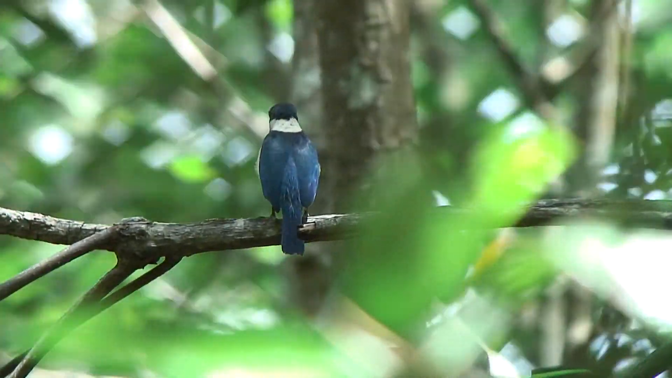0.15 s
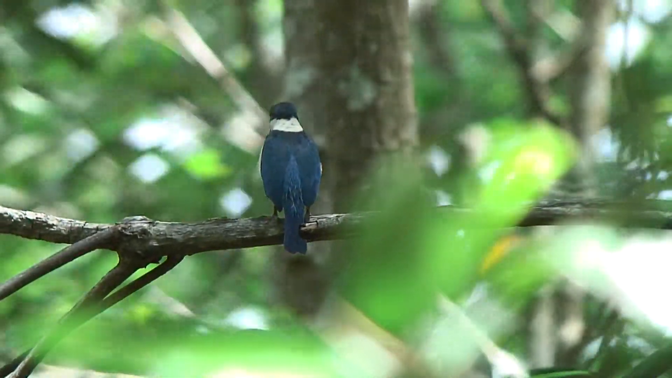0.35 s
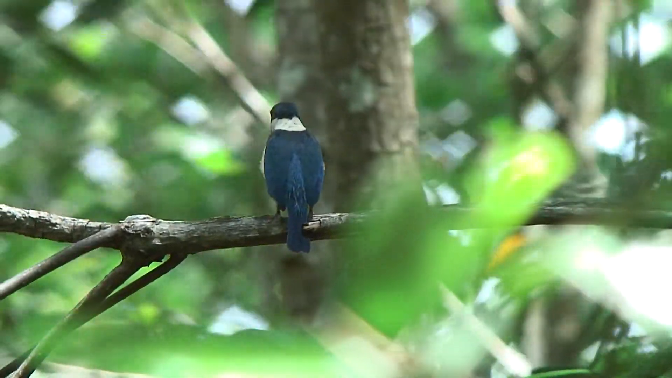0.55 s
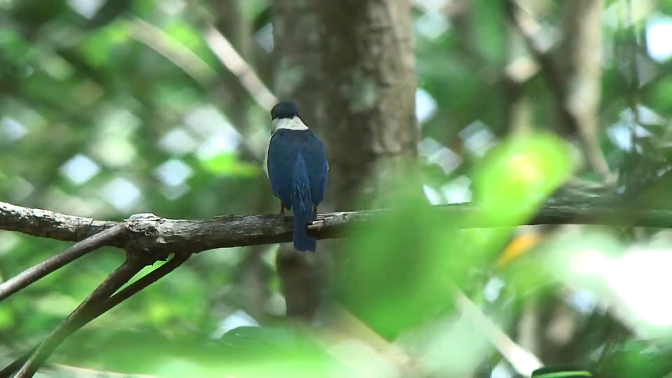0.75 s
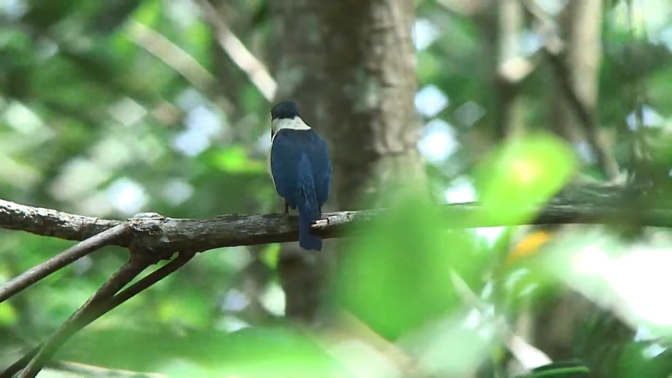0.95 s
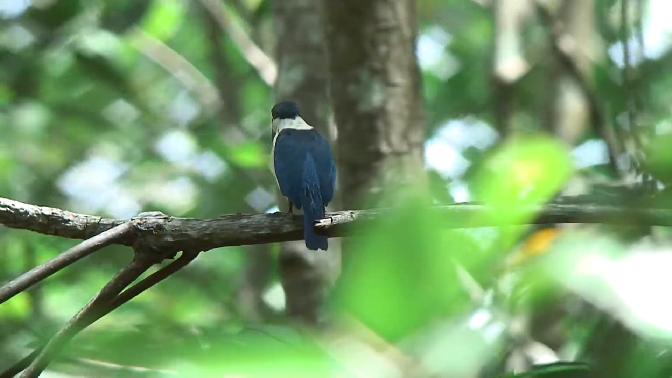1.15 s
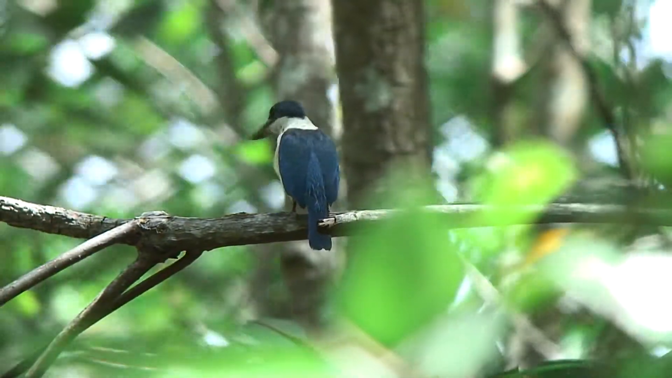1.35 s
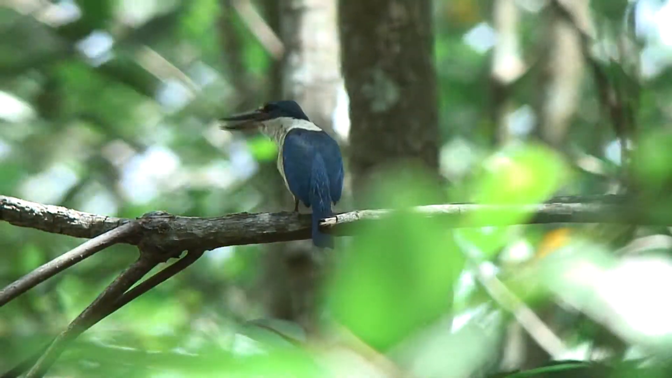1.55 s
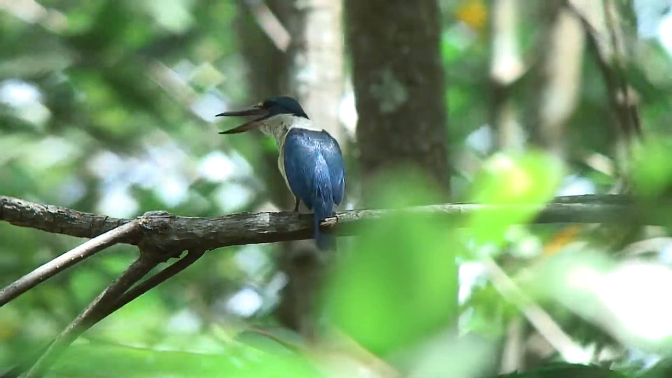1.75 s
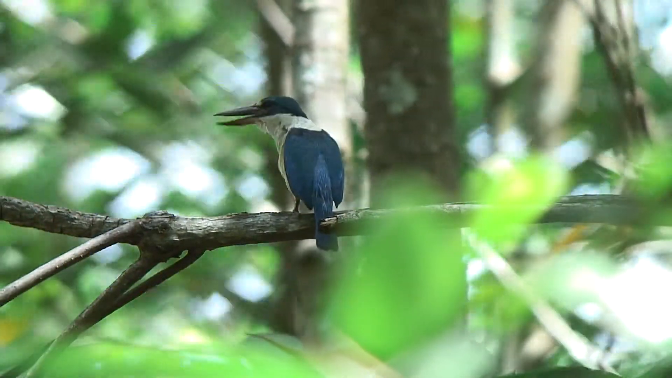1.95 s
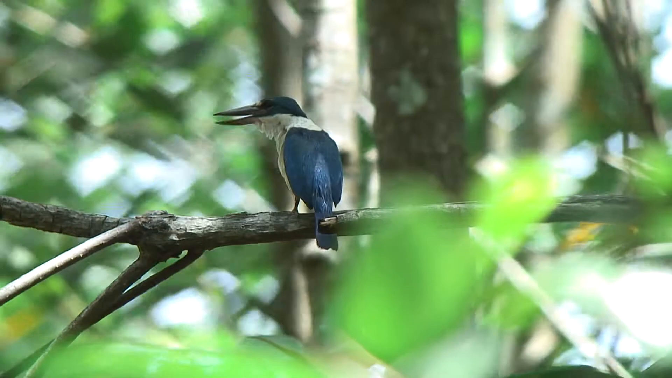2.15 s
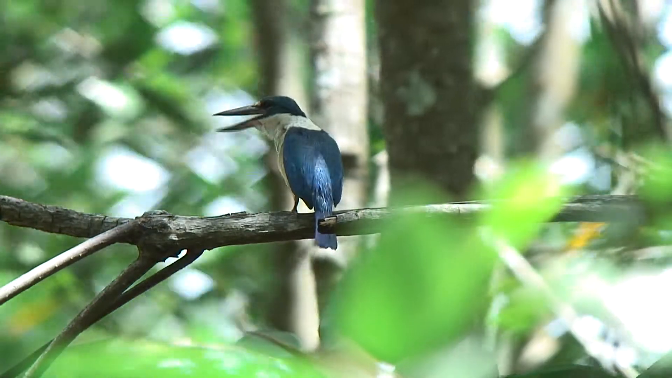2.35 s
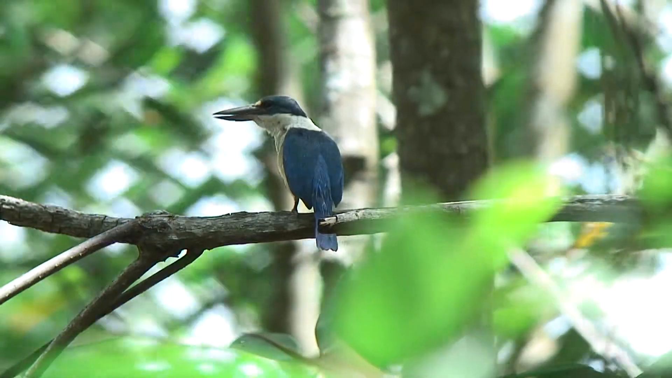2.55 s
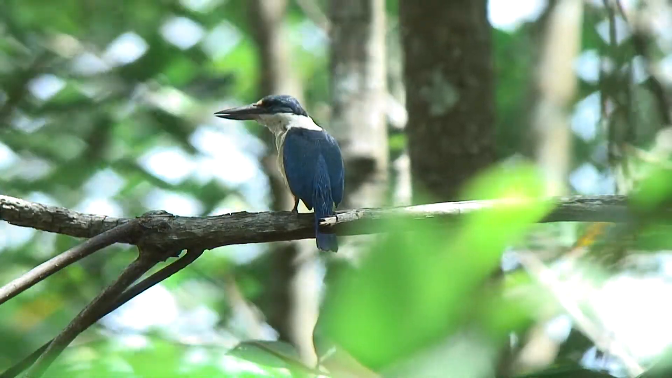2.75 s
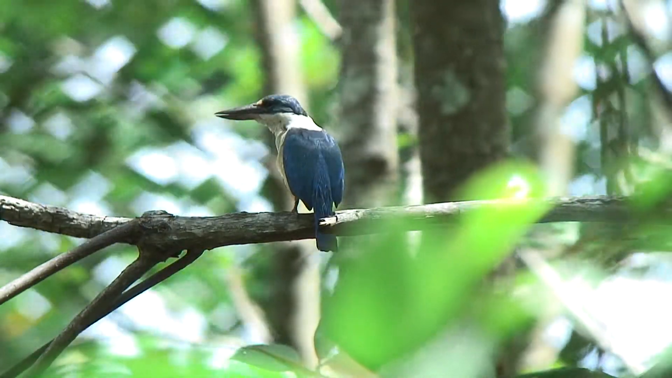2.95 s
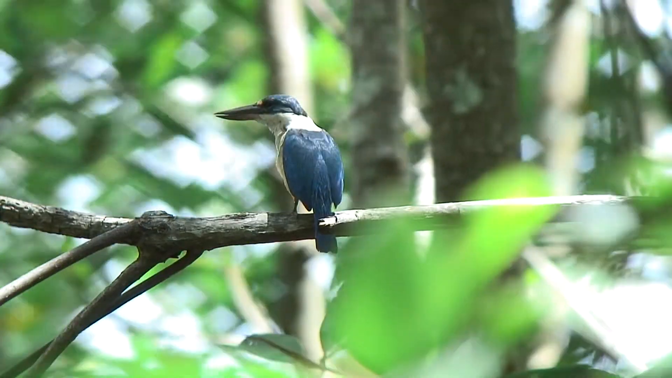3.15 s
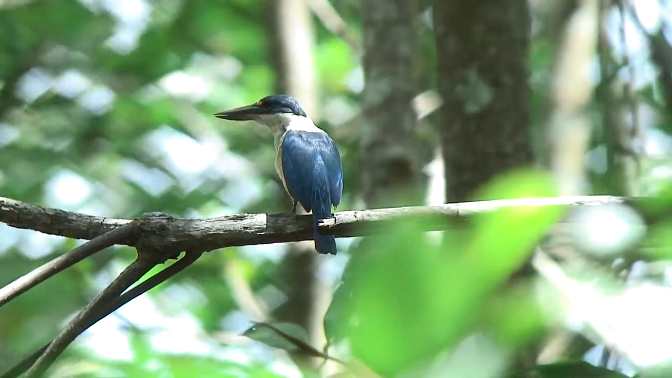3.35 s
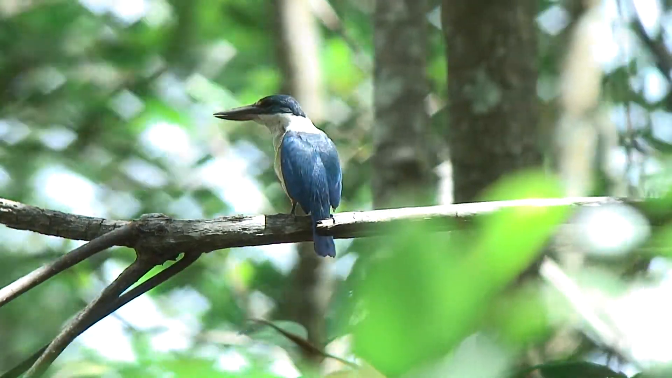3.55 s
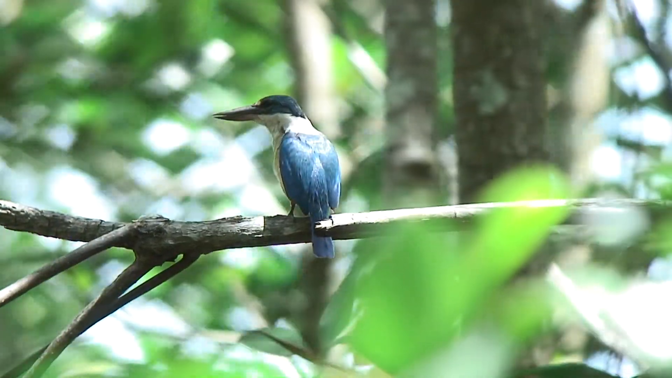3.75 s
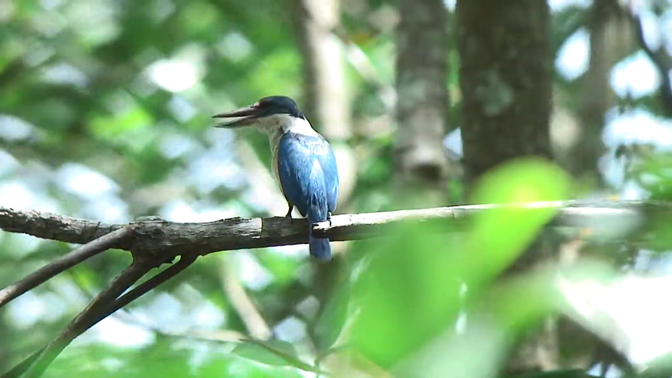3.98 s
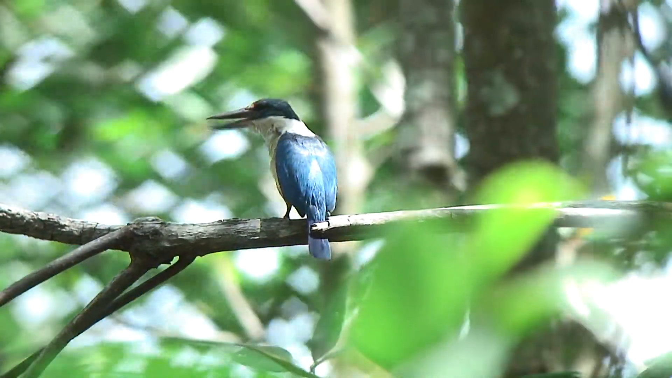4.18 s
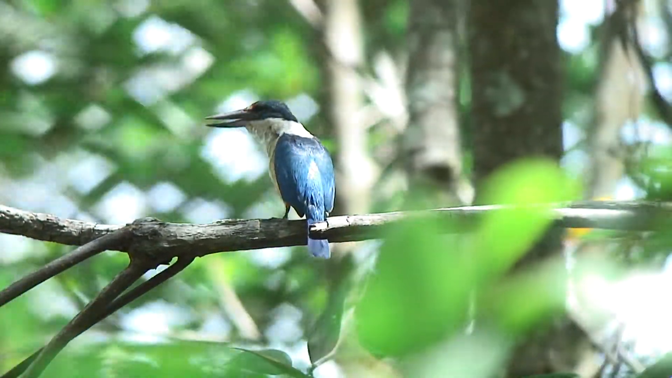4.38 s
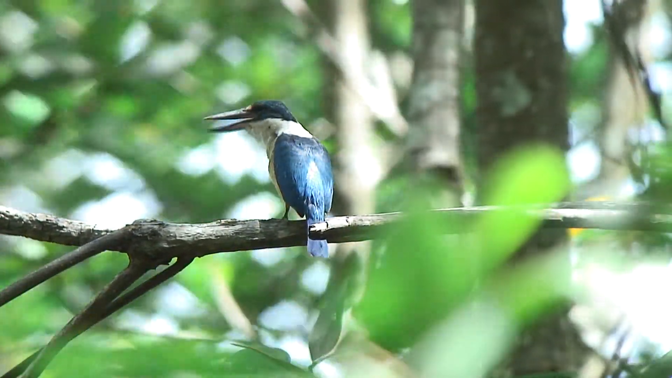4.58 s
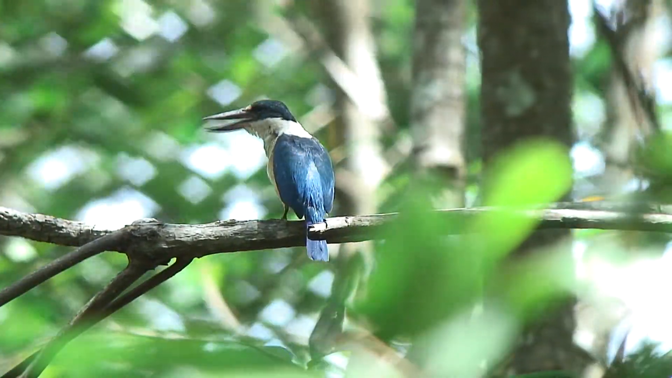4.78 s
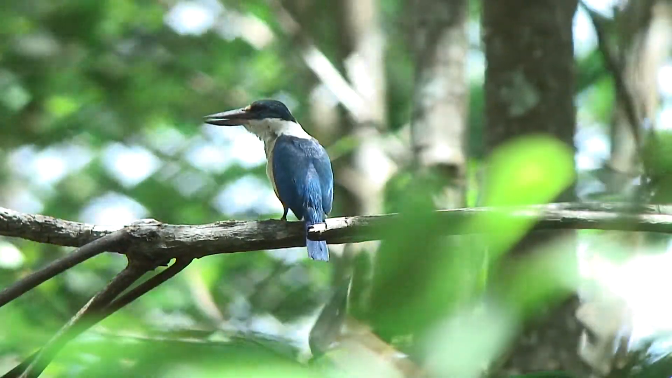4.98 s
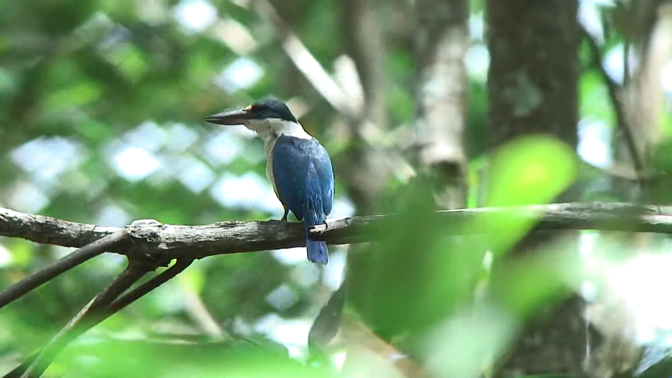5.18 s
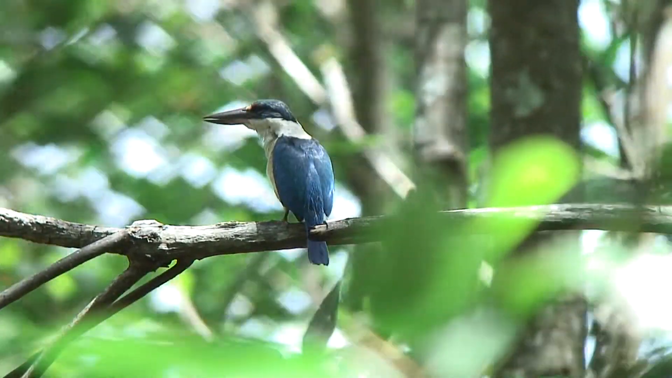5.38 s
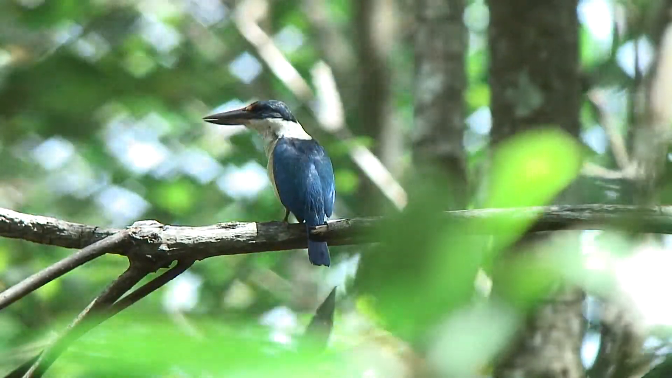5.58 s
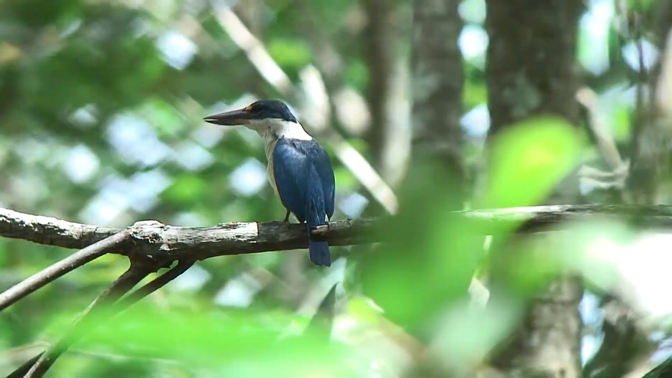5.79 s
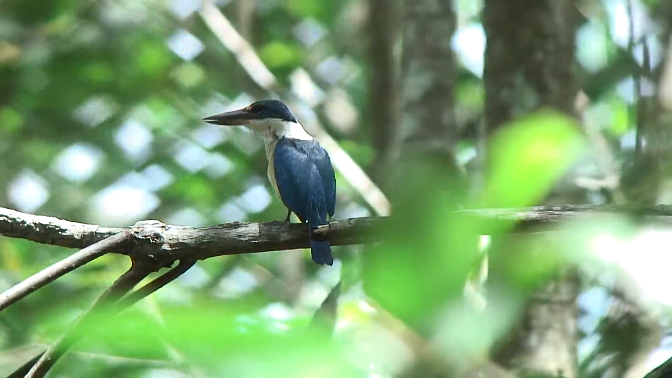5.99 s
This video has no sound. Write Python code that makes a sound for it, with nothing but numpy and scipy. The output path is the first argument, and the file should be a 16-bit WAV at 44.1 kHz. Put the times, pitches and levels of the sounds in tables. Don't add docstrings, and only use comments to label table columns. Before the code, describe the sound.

A kingfisher on a branch gives two runs of four loud, harsh falling notes that ring through a softly hissing forest with faint insects.

```python
import sys
import numpy as np
from scipy import signal
from scipy.fft import rfft, irfft
from scipy.io import wavfile
from scipy.ndimage import uniform_filter1d

SR = 44100
rng = np.random.default_rng(int(sys.argv[2]) if len(sys.argv) > 2 else 0)


def dump_mix(stems):
    frames = np.atleast_2d(stems).T
    limited = np.clip(frames, -1, 1)
    pcm = np.round(limited * 32767).astype(np.int16)
    wavfile.write(sys.argv[1], SR, pcm)


def convert_level_to_amplitude(level_db):
    exponent = np.asarray(level_db, float) / 20
    return 10 ** exponent


N = 265746


def rms_one(x):
    return x / np.sqrt(np.mean(x ** 2) + 1e-20)


def at_hz(points, hz, column=1):
    points = np.array(points)
    return np.interp(np.log(hz), np.log(points[:, 0]), points[:, column])


def drift(rate_hz, size=N):
    r = np.exp(-2 * np.pi * rate_hz / SR)
    smoother = [[0.93, 0.017, 0.011, 1, -2 * r, r * r]]
    settled = signal.sosfilt(smoother, rng.standard_normal(size + SR))[SR:]
    return rms_one(settled)


def shaped_noise(spectrum, size=N):
    hz = np.maximum(np.arange(size // 2 + 1) * SR / size, 1)
    return irfft(rfft(rng.standard_normal(size)) * convert_level_to_amplitude(at_hz(spectrum, hz)), size)


def filtered(x, order, cut_hz, kind):
    return signal.sosfilt(signal.butter(order, cut_hz, kind, fs=SR, output="sos"), x)


def kingfisher():
    # start_s, held_s, top_pitch_hz, level_db, half_lines_db
    lead_notes = [
        (1.583, 0.041, 1623, -30.5, -17.5),
        (4.079, 0.051, 1580, -28.5, -15.5),
    ]
    full_notes = [
        (1.841, 0.0657, 1726, -27, -1.2),
        (2.128, .065, 1711, -26.5, -0.83),
        (2.418, 0.058, 1662, -27.5, 2),
        (4.335, 0.073, 1720, -26.5, 0.65),
        (4.619, .067, 1727, -27, 1.8),
        (4.910, 0.0555, 1671, -27, -0.29),
    ]
    lead_glide = (.14, .24, .035, .07, 0, .125, .4)
    full_glide = (.2, .14, .018, .15, .068, .125, .2)
    # stage, effort_db
    lead_effort = [(0, -33), (.1, -10.5), (.4, -8), (1, -1), (1.62, 4.5), (1.8, -6), (2, -20)]
    full_effort = [(0, -44.5), (.17, -7), (.3, 1), (1, 1.91), (1.66, 1.5), (1.751, -2), (1.92, -2.5),
                   (1.999, -23)]
    # onset_db, held_db, after_break_db, end_db
    lead_bill = [(-5, 1.5, -5, -12), (-3, 5, -4, -11), (-31.5, -16, -2, -12)]
    full_bill = [(-9, 4, -7, -9.5), (-1, 0.5, -9, -16), (-22, -15, -6, -1.5)]
    # set_in_s, then half lines before_db, set_in_db, break_db, after_db, end_db,
    # and quarter_under_half_db
    lead_doubling = (-0.8, -18, -13.5, -21, -20, -20, -10.5)
    full_doubling = (0.04, -32, -0.31, -9, 0, -15, -23.5)
    # stage, width_stages, change_db
    full_catches = [
        (1.072, 0.04, -3),
        (1.54, 0.0604, -3),
    ]

    # length in s, pitch in Hz it is scaled on
    lead = dict(glide=lead_glide, push=lead_effort, catches=[], bill=lead_bill, doubling=lead_doubling,
                fall_s=0.071, fall_hz=1610, rasp_db=-37)
    full = dict(glide=full_glide, push=full_effort, catches=full_catches, bill=full_bill,
                doubling=full_doubling, fall_s=0.052, fall_hz=1725, rasp_db=-30)
    out = np.zeros(N)
    for kind, notes in [(lead, lead_notes), (full, full_notes)]:
        for start_s, *controls in notes:
            sound = note(*controls, **kind)
            start = round(start_s * SR)
            out[start:start + len(sound)] += sound
    return filtered(out + 1e-18, 6, 900, "high")


def note(held_s, top_hz, level_db, half_db, glide, push, catches, bill, doubling, fall_s, fall_hz, rasp_db):
    # frequency_hz, level_db
    throat = [(800, -60), (1300, -20.5), (1700, -16.5), (2050, -19), (2350, -7), (2800, -2), (3450, 2.5),
              (3800, -9.5), (4250, -12), (5200, -21.5), (6900, -25), (7800, -30.5), (9100, -29),
              (10200, -36), (13500, -37.5)]
    jitter, shimmer_db, wobble_db = 0.00605, 2.0, 3.5
    t = np.arange(int((held_s + fall_s) * SR)) / SR
    stage = np.interp(t, [0, held_s, held_s + fall_s], [0, 1, 2])
    unsteady = 0.352 + np.clip(stage - 0.8, 0, 1)

    effort_db = np.interp(stage, *np.transpose(push))
    for catch_at, catch_width, catch_db in catches:
        effort_db = effort_db + catch_db * np.exp(-((stage - catch_at) / catch_width) ** 2)

    scale_hz = np.interp(stage, [1, 1.15], [top_hz, fall_hz])
    pitch = scale_hz * pitch_ratio(stage, *glide)
    pitch = pitch * (1 + jitter * unsteady * drift(110, size=len(t)))
    turns = np.cumsum(pitch) / SR

    order = np.arange(2, 49)[:, None] / 4
    hz = order * pitch
    source_db = line_levels(order, stage, bill, doubling, held_s, half_db)
    moments = np.arange(0, t[-1] + 0.01, 0.007)
    chances = rng.standard_normal((len(order), len(moments)))
    wobble = np.array([np.interp(t, moments, row) for row in chances])
    source_db = source_db + wobble_db * unsteady * wobble
    gains = convert_level_to_amplitude(source_db + at_hz(throat, hz)) * (hz < 0.45 * SR)
    start_turns = rng.random((len(order), 1))
    lines = gains * np.sin(2 * np.pi * (order * turns + start_turns))

    voice = lines.sum(axis=0) + rasp_of_air(stage, turns, rasp_db)
    shimmer = shimmer_db * unsteady * drift(110, size=len(t))
    return convert_level_to_amplitude(level_db + 2.5 + effort_db + shimmer) * voice


def pitch_ratio(stage, scoop, snap_at, snap_width, arch, drop, glide, collapse):
    arch_top, break_at, break_width, collapse_at = 0.62, 1.02, 0.05, 1.61
    below = scoop / (1 + np.exp((stage - snap_at) / snap_width))
    below = below + arch * (np.minimum(stage, 1) - arch_top) ** 2
    fall = drop / (1 + np.exp((break_at - stage) / break_width))
    fall = fall + glide * np.maximum(stage - 1, 0)
    return 1 - below - fall - collapse * np.maximum(stage - collapse_at, 0)


def line_levels(order, stage, bill, doubling, held_s, half_db):
    lowest, middle, top = [np.interp(stage, [0.1, 0.2, 1, 1.12, 2], [a, b, b, c, d]) for a, b, c, d in bill]
    sets_in_s, *halves_db, quarter_db = doubling
    sets_in = sets_in_s / held_s
    halves = half_db + np.interp(stage, [sets_in - 0.1, sets_in, 1, 1.12, 2], halves_db)
    between = halves + np.where(order % 0.5 == 0, 0, quarter_db)
    levels = np.where(order % 1 == 0, 0, between)
    levels = levels + (order == 1) * lowest
    levels = levels + np.isin(order, [3, 4]) * middle
    levels = levels + (order > 4.6) * top
    levels = levels - 7.5 * ((order % 2 == 1) & (order > 4))
    levels = levels - 4.5 * (order == 3 / 2)
    return levels - 4 * ((order % 1 > 0) & (order > 3.2 + 0.4 * (stage < 1)))


def rasp_of_air(stage, turns, rasp_db):
    # frequency_hz, level_db
    rasp_colour = [(1500, -50.5), (2200, -23.5), (3200, -9.5), (4500, 5), (7000, -14.5), (9000, -3),
                   (12000, -23), (15500, -32)]
    gate = 1 + np.cos(np.pi * turns)
    comes_in = np.clip((stage - 0.7) / 0.5, 0, 1)
    return convert_level_to_amplitude(rasp_db) * comes_in * gate * rms_one(shaped_noise(rasp_colour, size=len(stage)))


def side_on(x):
    high = signal.butter(2, 4500, "high", fs=SR, output="sos")
    return x - 0.389 * signal.sosfiltfilt(high, x)


def sharp_clicks():
    # time_s, peak_db
    click_times = [
        (4.3925, -46),
        (4.6475, -46),
    ]
    return dry_ticks(click_times, decay_s=0.0003, low_hz=8000)


def dry_ticks(ticks, decay_s, low_hz):
    t = np.arange(N) / SR
    burst = 0
    for start_s, peak_db in ticks:
        burst = burst + convert_level_to_amplitude(peak_db) * np.exp(-np.clip((t - start_s) / decay_s, 0, 100)) * (t >= start_s)
    return burst * filtered(rng.standard_normal(N), 3, low_hz, "high")


def forest(x):
    # frequency_hz, time_to_fall_60_db_s, level_db
    scattering = [(1268, .9, -2), (1976, 0.46, -11), (2638, 1.124, 3), (3480, 1.023, -2),
                  (5360, 0.88, -1.5), (6780, 0.95, 0.5), (9800, 0.677, 3.5), (15000, 0.44, 3.5)]
    build_s = 0.0016
    t = np.arange(2 * SR) / SR
    borders_hz = 900 * 2 ** np.arange(0, 4.3, 1 / 3)
    tail = 0
    for low_hz, high_hz in zip(borders_hz, borders_hz[1:]):
        hz = np.sqrt(low_hz * high_hz)
        band = filtered(rng.standard_normal(len(t)), 2, [low_hz, high_hz], "band")
        fall = convert_level_to_amplitude(-60 * t / at_hz(scattering, hz)) * (1 - np.exp(-t / build_s))
        fall = fall / np.sqrt(np.sum(fall ** 2))
        tail = tail + convert_level_to_amplitude(at_hz(scattering, hz, column=2)) * band * fall
    return signal.fftconvolve(x, tail)[:N]


def far_insects():
    # start_s, end_s, start_level_db, end_level_db
    low_insect = [
        (-1, 1.6, -72, -72),
        (1.6, 7, -84, -84),
    ]
    high_insect = [
        (-1, .7, -84, -79),
        (.9, 7, -74.5, -76),
    ]
    phrasing_insect = [
        (2.62, 2.9, -77, -69),
        (3.2, 3.8, -69, -68.5),
        (4.06, 4.62, -67, -72),
        (5.1, 5.68, -66, -69.5),
        (5.97, 7, -71, -67),
    ]
    steady = dict(swell_db_per_s=20, die_db_per_s=8, throb_hz=52, depth=0.4)
    out = shrill(low_insect, hz=6280, width_hz=230, **steady)
    out = out + shrill(high_insect, hz=7480, width_hz=220, **{**steady, "throb_hz": 55})
    return out + shrill(phrasing_insect, hz=7280, width_hz=120, swell_db_per_s=200, die_db_per_s=220,
                        throb_hz=55, depth=0.6)


def shrill(spells, swell_db_per_s, die_db_per_s, hz, width_hz, throb_hz, depth):
    r = np.exp(-np.pi * width_hz / SR)
    ringing = [1, 0, -1, 1, -2 * r * np.cos(2 * np.pi * hz / SR), r * r]
    beat = np.sin(2 * np.pi * np.cumsum(throb_hz * (1 + 0.044 * drift(3.9))) / SR)
    tone = signal.sosfilt([ringing, ringing], rng.standard_normal(N))
    return in_time(spells, swell_db_per_s, die_db_per_s) * rms_one(tone * (1 + depth * beat))


def in_time(spells, swell_db_per_s, die_db_per_s):
    t = np.arange(N) / SR
    gain = 0
    for start_s, end_s, start_db, end_db in spells:
        held_db = np.interp(t, [start_s, end_s], [start_db, end_db])
        before_db = swell_db_per_s * np.maximum(start_s - t, 0)
        after_db = die_db_per_s * np.maximum(t - end_s, 0)
        gain = gain + convert_level_to_amplitude(held_db - before_db - after_db)
    return gain


def far_bird():
    # start_s, end_s, start_level_db, end_level_db
    far_call = [
        (5.96, 7, -61, -60),
    ]
    return shrill(far_call, swell_db_per_s=630, die_db_per_s=630, hz=2794, width_hz=400, throb_hz=30, depth=0.25)


def twig():
    # time_s, peak_db
    twig_ticks = [
        (5.82, -55),
        (5.826, -58),
        (5.834, -57),
        (5.844, -66),
    ]
    return dry_ticks(twig_ticks, decay_s=0.003, low_hz=9000)


def rustles():
    # time_s, length_s, level_db
    stirs = [
        (.8, .04, -79),
        (.885, .06, -75),
        (.945, .03, -79),
        (1.15, .04, -78),
        (1.21, .05, -78),
        (3.95, .12, -77),
        (5.88, .08, -77),
    ]
    t = np.arange(N) / SR
    swell = 0
    for middle_s, length_s, stir_db in stirs:
        swell = swell + convert_level_to_amplitude(stir_db) * np.exp(-2 * np.minimum(((t - middle_s) / length_s) ** 2, 100))
    grains = rng.standard_normal(N) * convert_level_to_amplitude(3 * drift(300))
    return swell * filtered(grains, 2, 5000, "high")


def foliage():
    # frequency_hz, level_db_per_hz
    hiss_colour = [(35, -67.5), (150, -45), (300, -44), (430, -28.5), (930, -9.5), (1870, 1), (3000, 1),
                   (4520, -3.5), (5700, -7.5), (6400, -8.5), (6700, -12.5), (7400, -13.5), (8000, -16),
                   (14500, -23)]
    hiss_db, fade_db_per_s, patchy_db = -77, 0.13, 0.4
    gust_s, gust_length_s, gust_db = 1.14, 0.3, 1.3
    t = np.arange(N) / SR
    hiss = shaped_noise(hiss_colour)
    low_part = filtered(hiss, 4, [500, 1100], "band")
    gust = gust_db * np.exp(-((t - gust_s) / gust_length_s) ** 2)
    breeze_db = hiss_db - fade_db_per_s * t + gust
    return hiss / np.std(low_part) * convert_level_to_amplitude(breeze_db + patchy_db * drift(1.3))


def scene():
    bird = kingfisher()
    near = side_on(bird) + forest(bird) + sharp_clicks()
    behind = far_insects() + far_bird() + twig() + rustles() + foliage()
    return (near + behind)[None]


def band_of(x, low_hz, high_hz):
    hz = np.arange(N // 2 + 1) * SR / N
    return irfft(rfft(x) * ((hz >= low_hz) & (hz < high_hz)), N)


def top_cut(x):
    return signal.sosfilt(signal.butter(12, 15640, fs=SR, output="sos"), x)


def record(dry):
    # from_hz, to_hz, threshold_db
    top_bands = [
        (14300, 15000, -78.2),
        (15000, 15700, -71),
    ]
    frame = np.arange(N) // 1024
    treble = np.bincount(frame, band_of(dry[0], 11000, 14300) ** 2) / np.bincount(frame)
    out = band_of(dry[0], 0, top_bands[0][0])
    for low_hz, high_hz, threshold_db in top_bands:
        is_open = (treble > convert_level_to_amplitude(threshold_db) ** 2)[frame]
        opened = uniform_filter1d(1.0 * is_open, size=256)
        out = out + opened * band_of(dry[0], low_hz, high_hz)
    return top_cut(out[None])


dry = scene()
out = record(dry)
dump_mix(out)
```